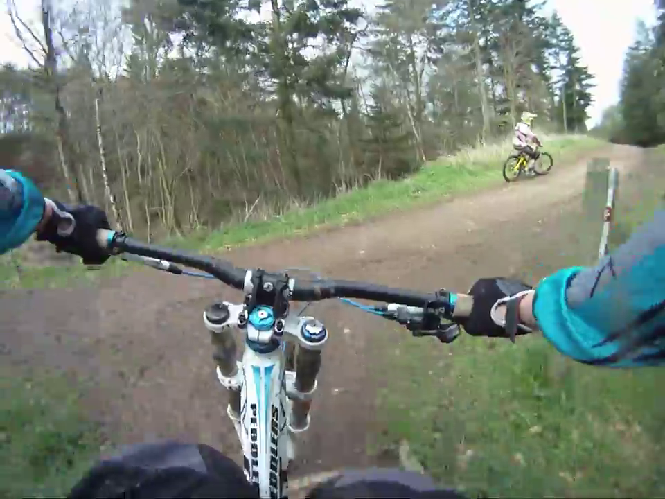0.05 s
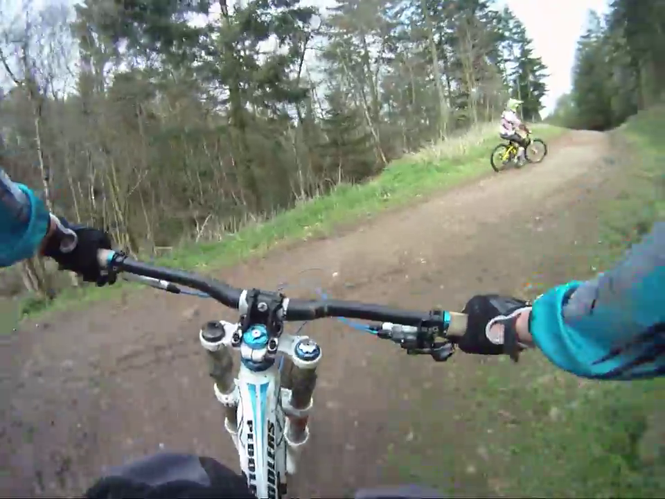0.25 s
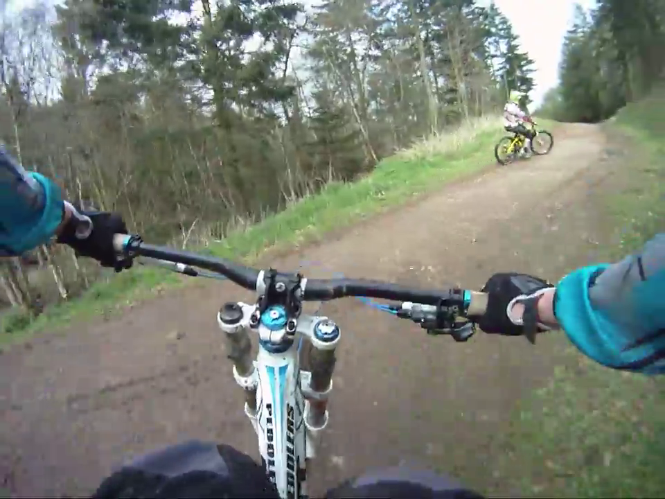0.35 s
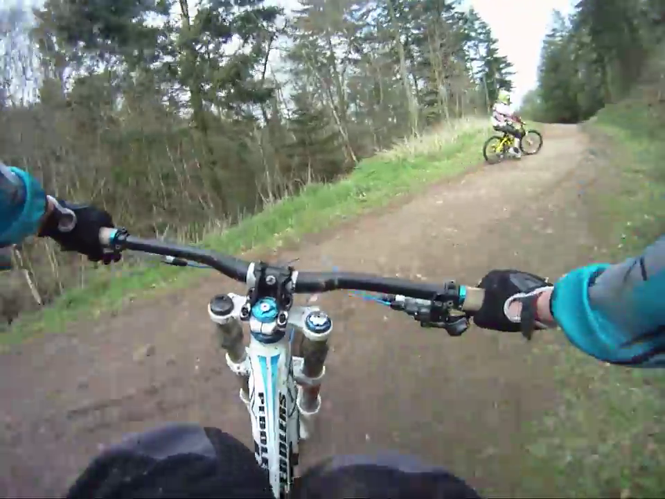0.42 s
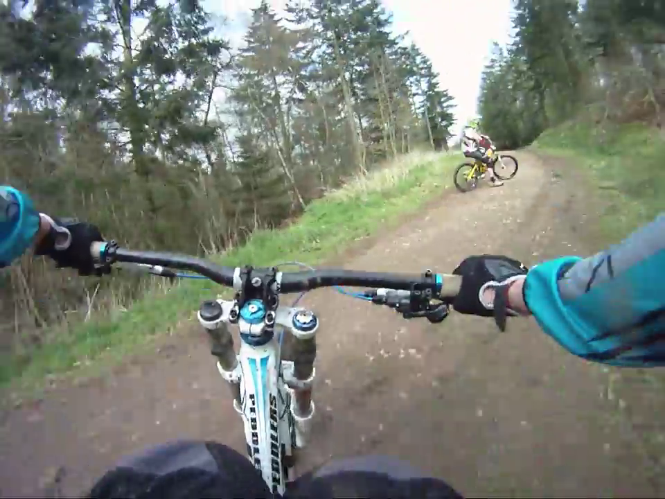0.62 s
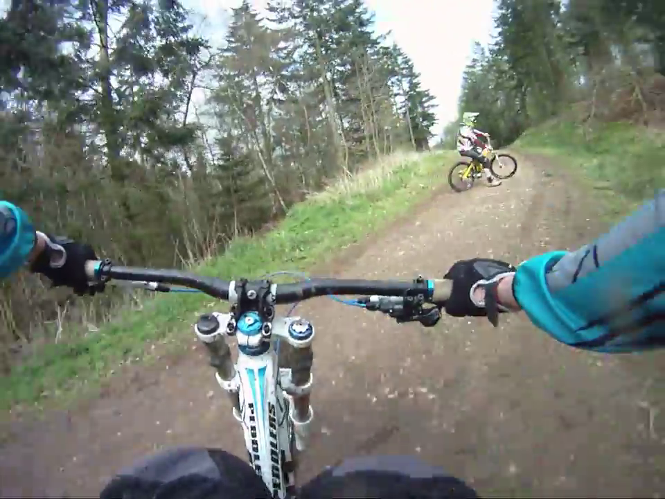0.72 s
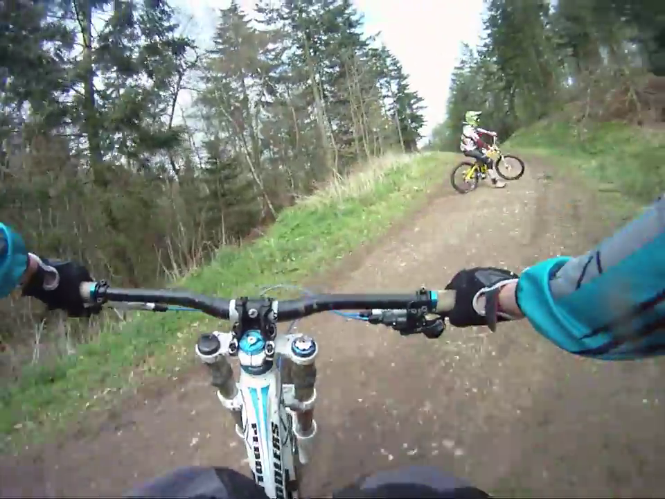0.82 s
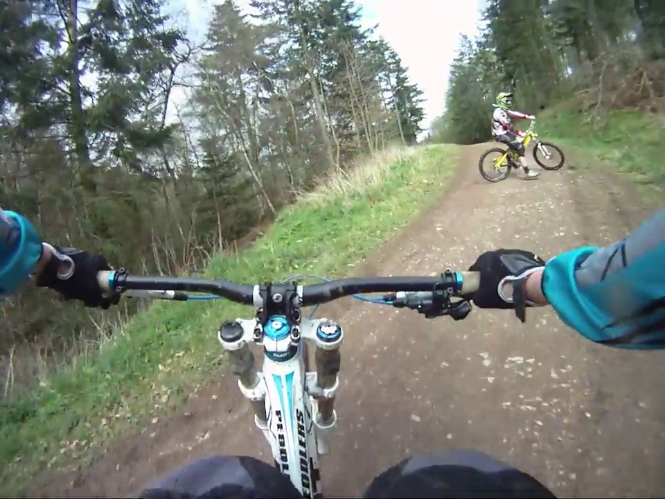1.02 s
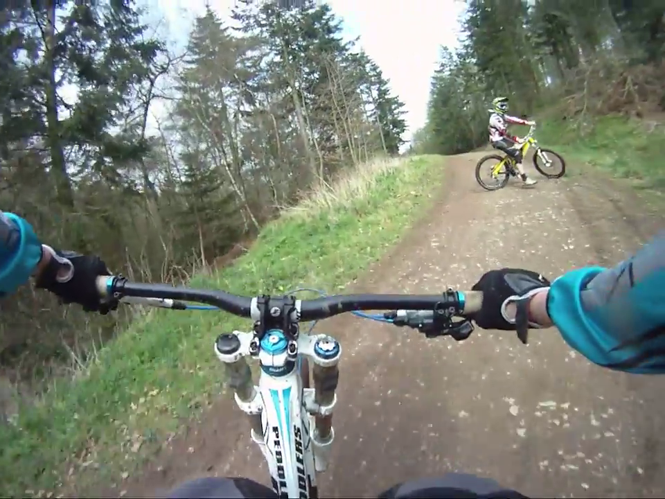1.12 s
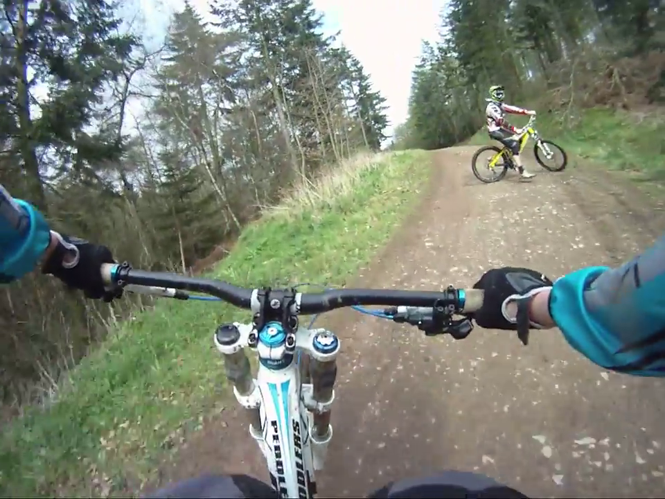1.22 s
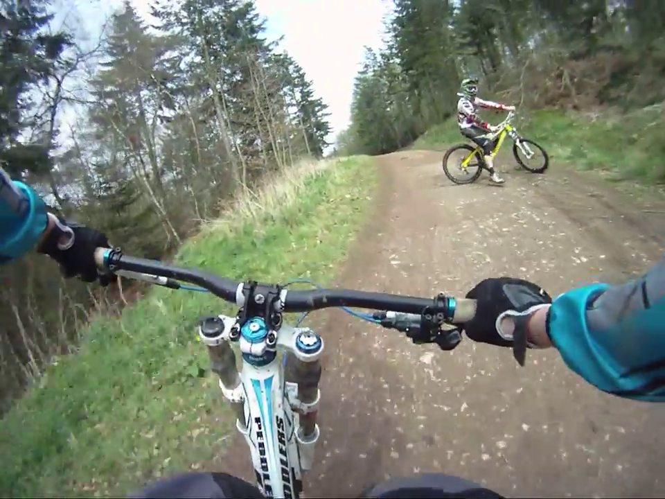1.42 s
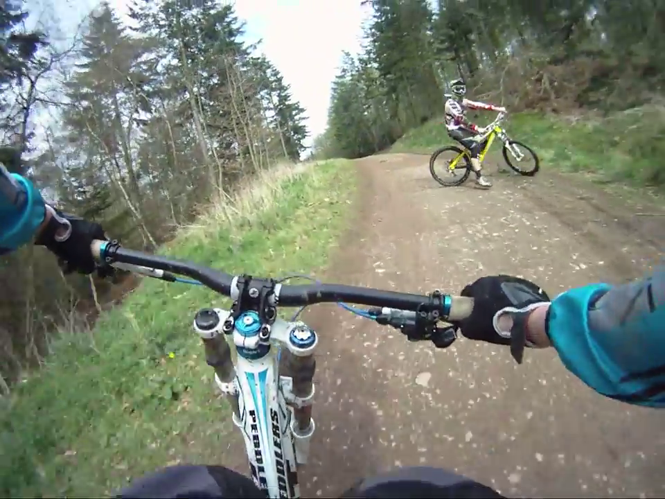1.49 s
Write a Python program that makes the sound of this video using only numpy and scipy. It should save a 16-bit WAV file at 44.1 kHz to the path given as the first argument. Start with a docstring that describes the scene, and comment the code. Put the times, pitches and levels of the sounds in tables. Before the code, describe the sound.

A bicycle rattles with hard, uneven clacks and low thuds on rough ground.

```python
"""Rough dirt track, heard from a camera worn by a mountain bike rider.
Chain and loose parts clack, each blow ringing the same few short modes. Bumps thud, stones ping,
tyres hiss and flick grit, air rumbles. The camera samples coarsely and overloads on the hard knocks,
which gives them a bright metallic edge."""
import sys
import numpy as np
from scipy import signal
from scipy.fft import rfft, irfft
from scipy.io import wavfile

SR = 44100
rng = np.random.default_rng(int(sys.argv[2]) if len(sys.argv) > 2 else 0)


def store_wav(level_fs):
    """Save 16-bit WAV to argv[1]."""
    pcm = np.round(np.clip(np.atleast_2d(level_fs), -1, 1) * 32767)
    wavfile.write(sys.argv[1], SR, pcm.T.astype(np.int16))


N = 68355

# chain and loose-part blows: start_s, level_db, pitch_hz, contact_s, release_t60_s, crack_db, push_db
KNOCKS = [(.0892, -44, 1900, 0.00092, 0.033, -9, -1), (0.2076, -37, 2160, 0.0011, 0.023, -8.5, -4),
          (.2187, 5, 2157, 0.0023, 0.0078, -14, -20.5), (0.2488, -36, 2130, 0.0052, 0.015, -12, -9),
          (0.2651, -18.5, 2310, 0.0015, 0.011, -18, -30), (0.2707, -24, 2320, 0.00077, 0.024, -8, -12),
          (.2797, 1, 2136, 0.0036, 0.011, -14, -17), (0.2868, -6, 2118, 0.005, 0.015, -18, -15.5),
          (0.3172, -39, 2100, 0.0006, .01, -16, -22), (.3492, -32.5, 2160, 0.00053, .009, -2.5, -17),
          (.3596, -23.5, 2000, 0.0014, 0.0089, -11, -21), (.413, -44.5, 2090, 0.0018, 0.039, -4.5, -20),
          (0.4636, -36.5, 2205, 0.002, 0.022, -19, -22), (0.5494, 8.5, 2109, 0.0029, 0.0061, -18, -25),
          (.602, -24, 2020, 0.00088, 0.0074, -8, -44), (0.608, -30.5, 2160, 0.0022, 0.011, -3, -15),
          (0.6324, -3, 2079, 0.019, 0.0098, -20.5, -15.5), (0.6563, -4, 2081, 0.004, 0.017, -19, -18),
          (0.806, -6, 2147, .0012, 0.017, -14.5, -23), (0.844, -41, 1750, .002, .015, -13, -18),
          (0.9034, -41, 2150, .001, .01, -24, -3), (0.9362, -33, 2060, 0.00053, 0.0076, -36, -4.5),
          (0.9545, 6, 2114, 0.0028, 0.0067, -25.5, -22.5), (0.9853, -36, 2130, .001, .01, -18.5, -16.5),
          (1.123, -39, 1930, 0.0012, 0.015, -10, -22), (1.1682, -14.5, 2123, 0.00034, .017, -45, -8),
          (1.3037, -27.5, 2060, 0.0014, 0.015, -21, -0.5), (1.4362, -41.5, 2130, .001, 0.031, -19, -24.5),
          (1.452, -41.5, 2070, .003, .015, -12, -16)]
# modes of the struck parts, at REF_PITCH_HZ: freq_hz, level_db, free_t60_s
KNOCK_MODES = [(1119, -26.5, 0.035), (1169.5, -19.5, 0.04), (1770, -27, 0.0073), (2106.7, -2.5, .018),
               (2270, -20.5, .014), (2806, -28.5, 0.012), (3590, -28.5, .032), (4170, -37.5, 0.016)]
REF_PITCH_HZ, REF_T60_S = 2100, .018
# contact noise: freq_hz, density_db
CRACK_SPECTRUM = [(60, 8.5), (200, -2), (500, -8.5), (900, -2.5), (1500, -2.5), (2200, 6), (2800, 7),
                  (3400, -0.5), (4200, -0.5), (5500, -15), (7000, -10.5)]
# track bumps: centre_s, level_db, sway_hz, half_width_s
BUMPS = [(0.262, -19, 31.4, .014), (0.291, -18.5, 45, .008), (.334, -22, 18, .02),
         (0.597, -26.5, 60.5, 0.013), (0.871, -29.5, 30.2, 0.066), (.9225, -12.5, 45, 0.0093),
         (1.257, -15.5, 36.3, 0.018), (1.292, -25, 26, 0.013)]
# bike shudder: freq_hz, density_db
SHUDDER_SPECTRUM = [(50, -3.5), (110, 2.5), (170, -3.5), (300, -26.5), (700, -25)]
# stone strikes, plus a bright tick on the knock at 0.602 s: start_s, level_db
STONE_HITS = [(.2525, -43), (.272, -54), (.353, -38), (.5095, -45), (.518, -48), (.602, -33), (.648, -40),
              (1.0095, -49), (1.2625, -41.5)]
# stone tick: freq_hz, density_db
STONE_SPECTRUM = [(500, -12.5), (2000, -24), (3600, -2), (4500, -3), (7000, -3)]
# tyre hiss: freq_hz, density_db
TYRE_SPECTRUM = [(150, -1.5), (400, -0.5), (700, -6.5), (1150, 0), (1650, 1), (2100, 2.5), (2700, -6),
                 (3700, -6.5), (5000, -9), (5800, -6.5)]
# tyre hiss and grit: time_s, level_db
TYRE_LEVELS = [(0, -54.5), (.2, -57.5), (.33, -50), (.43, -58), (.51, -54), (.57, -55.5), (.75, -58),
               (1.08, -59), (1.22, -54.5), (1.35, -57), (1.55, -56.5)]
# flicked grit: freq_hz, density_db
GRIT_SPECTRUM = [(500, -18.5), (1200, -11.5), (2100, 2), (3000, -8), (4200, 0.5), (5500, -0.5)]
# light rub: freq_hz, density_db
RUB_SPECTRUM = [(300, -18), (700, -14), (1200, -5.5), (1650, -0.5), (2300, -14), (3350, -12.5), (3700, 5),
                (4000, -14), (5500, -17)]
# light rub: time_s, level_db
RUB_LEVELS = [(0, -91.5), (1.09, -75), (1.13, -57), (1.25, -55.5), (1.33, -58.5), (1.55, -64.5)]
# rumble: freq_hz, density_db
RUMBLE_SPECTRUM = [(10, -21), (20, 10.5), (32, -14.5), (50, -14), (80, -16), (130, -22.5), (250, -42.5),
                   (500, -59)]
# rumble: time_s, level_db
RUMBLE_LEVELS = [(0, -29), (.2, -37.5), (.5, -36.5), (.75, -35.5), (1.0, -41.5), (1.2, -32.5), (1.4, -40.5),
                 (1.55, -43.5)]
# faint low antiphase noise for stereo width: freq_hz, density_db
LOW_WIDTH_SPECTRUM = [(20, 4.5), (60, -12), (130, -19.5), (260, -17.5), (600, -24.5)]


def knocks(push_s=.0001, tail_db=-18.5, chatter_depth=.25, chatter_hz=208.05):
    """Each blow pushes, cracks and drives the modes during contact, then dies fast to a faint ring."""
    out = np.zeros((2, N))
    contact_noise = noise(CRACK_SPECTRUM) + side_noise(CRACK_SPECTRUM, level_db=-26)
    chatters = [1 + chatter_depth * wander(chatter_hz) for _ in KNOCK_MODES]
    for start_s, level_db, pitch_hz, contact_s, release_t60_s, crack_db, push_db in KNOCKS:
        span, t = hit_span(start_s)
        crack = contact_noise[:, span] * blow_envelope(t, contact_s, t60_s=.012)
        push = t / push_s * np.exp(1 - t / push_s)
        knock = undb(crack_db) * crack - undb(push_db) * push
        for (mode_hz, mode_db, free_t60_s), chatter in zip(KNOCK_MODES, chatters):
            driven = blow_envelope(t, contact_s, release_t60_s * free_t60_s / REF_T60_S) * chatter[span]
            tail = undb(tail_db) * blow_envelope(t, contact_s, free_t60_s)
            ring = np.sin(2 * np.pi * mode_hz * pitch_hz / REF_PITCH_HZ * t)
            knock -= undb(mode_db) * ring * np.maximum(driven, tail)
        out[:, span] += undb(level_db) * knock
    return out


def blow_envelope(t, contact_s, t60_s, attack_s=.00091, sag_db_per_s=279.5):
    """Fast rise, sag while the parts touch, decay once they part."""
    drive = np.minimum(t / attack_s, 1) * undb(-sag_db_per_s * np.minimum(t, contact_s))
    return drive * decay(np.maximum(t - contact_s, 0), t60_s)


def bumps(shudder_db=-26.5):
    """Each bump sways the camera in a short bass pulse and makes the bike shudder."""
    out, t = np.zeros(N), np.arange(N) / SR
    shudder = undb(shudder_db) * noise(SHUDDER_SPECTRUM)
    for centre_s, level_db, sway_hz, half_width_s in BUMPS:
        sway = np.sin(2 * np.pi * sway_hz * (centre_s - t))
        envelope = np.exp(-((t - centre_s) / half_width_s) ** 2)
        out += undb(level_db) * (sway + shudder) * envelope
    return out


def stones():
    """Flung stones strike the bike: brief bright ticks. One tick sharpens the crack of a knock."""
    out, tick = np.zeros(N), noise(STONE_SPECTRUM)
    for start_s, level_db in STONE_HITS:
        span, t = hit_span(start_s)
        out[span] += undb(level_db) * tick[span] * decay(t, t60_s=.009)
    return out


def tyres(grit_per_s=130, grit_db=-15.5, scatter_db=5, flicker_db=1.5):
    """Tyres hiss on the dirt and flick grit at random."""
    grains = (rng.random(N) < grit_per_s / SR) * undb(scatter_db * rng.standard_normal(N))
    grit = undb(grit_db) * colour(grains, GRIT_SPECTRUM)
    hiss = noise(TYRE_SPECTRUM) * undb(flicker_db * wander(rate_hz=41))
    return gain_curve(TYRE_LEVELS) * (hiss + grit + side_noise(TYRE_SPECTRUM, level_db=-22))


def rub():
    """Late on, something rubs lightly, perhaps a brake."""
    return gain_curve(RUB_LEVELS) * noise(RUB_SPECTRUM)


def rumble():
    """Air and track shake on the microphone, mono. Faint low antiphase noise adds stereo width."""
    shake = noise(RUMBLE_SPECTRUM)
    width = side_noise(LOW_WIDTH_SPECTRUM, level_db=-33.5)
    return gain_curve(RUMBLE_LEVELS) * (shake + width)


def undb(level_db):
    """Decibels to gain."""
    return 10 ** (np.asarray(level_db) / 20)


def gain_curve(levels):
    """Gain per sample from (time_s, level_db) points."""
    return undb(np.interp(np.arange(N) / SR, *np.array(levels).T))


def colour(x, spectrum):
    """Shape x by a spectrum, roll off above its last point, scale to rms 1."""
    points_hz, density_db = np.array(spectrum).T
    freq_hz = np.maximum(np.fft.rfftfreq(N, 1 / SR), 1)
    gain = undb(np.interp(np.log(freq_hz), np.log(points_hz), density_db))
    rolloff = np.hypot(1, (freq_hz / points_hz[-1]) ** 6)
    shaped = irfft(rfft(x) * gain / rolloff, N)
    return shaped / shaped.std()


def noise(spectrum):
    """Coloured noise, rms 1."""
    return colour(rng.standard_normal(N), spectrum)


def side_noise(spectrum, level_db):
    """Antiphase left/right noise, for width."""
    return undb(level_db) * noise(spectrum) * np.array([[1], [-1]])


def wander(rate_hz):
    """Smooth random drift, spread near 1."""
    return np.interp(np.arange(N) / SR * rate_hz, np.arange(N), rng.standard_normal(N))


def hit_span(start_s):
    """Sample indices and elapsed seconds of a 50 ms hit."""
    first = int(start_s * SR)
    span = np.arange(first, min(first + SR // 20, N))
    return span, (span - span[0]) / SR


def decay(t, t60_s):
    """Exponential, 60 dB down at t60_s."""
    return np.exp(-np.log(1000) * t / t60_s)


def scene():
    """All sources travel with the camera and sit centred."""
    return knocks() + stones() + bumps() + tyres() + rub() + rumble()


def record(dry, input_hz=5500, camera_hz=12000, ceiling=.99, hold=4, top_hz=15500):
    """Camera samples slowly, clips and holds each sample, mirroring the knocks into the treble."""
    narrow = signal.sosfiltfilt(signal.butter(4, input_hz, fs=SR, output="sos"), dry)
    coarse = signal.resample_poly(narrow, camera_hz, SR, axis=1)
    clipped = np.clip(coarse, -ceiling, ceiling)
    steps = np.repeat(clipped, hold, axis=1)
    held = signal.resample_poly(steps, SR, camera_hz * hold, axis=1)[:, :N]
    return signal.sosfiltfilt(signal.ellip(8, .1, 60, top_hz, fs=SR, output="sos"), held)


dry = scene()
out = record(dry)
store_wav(out)
```